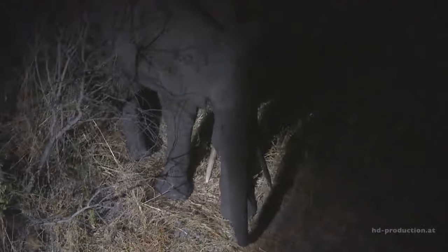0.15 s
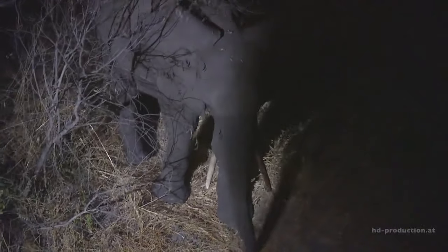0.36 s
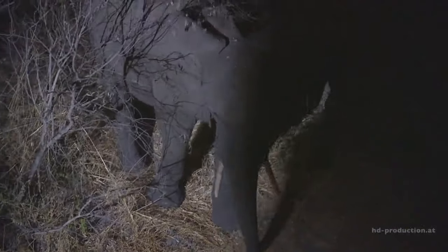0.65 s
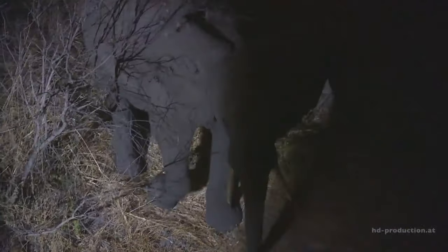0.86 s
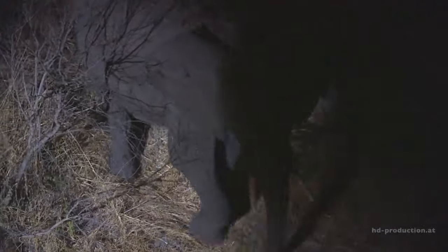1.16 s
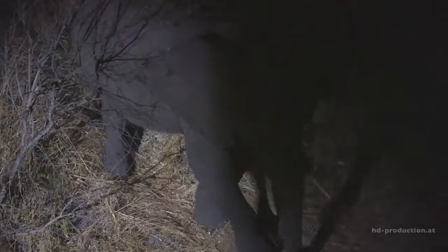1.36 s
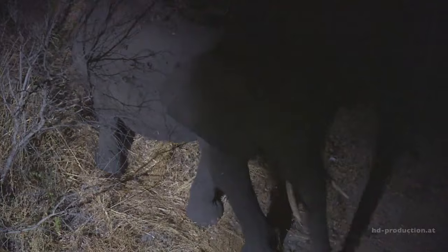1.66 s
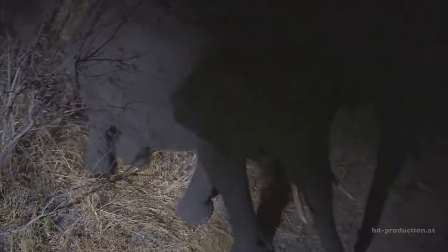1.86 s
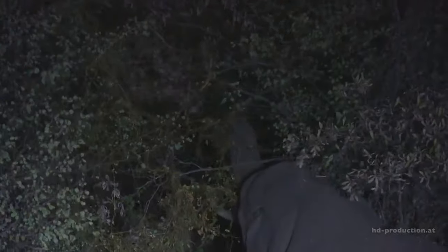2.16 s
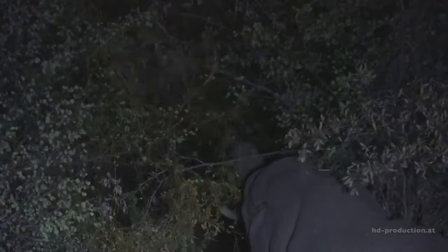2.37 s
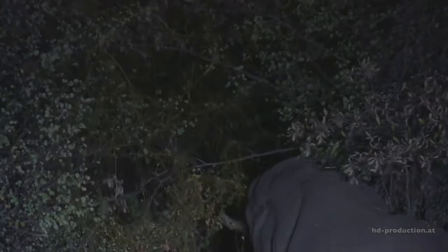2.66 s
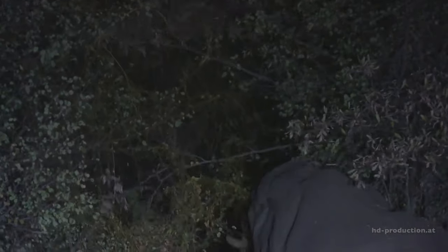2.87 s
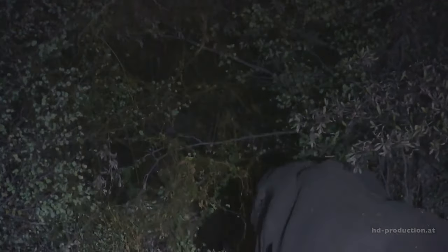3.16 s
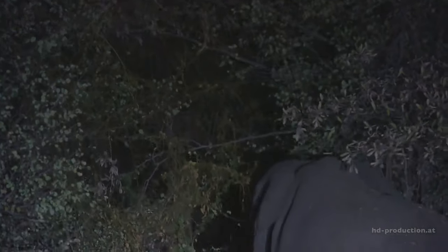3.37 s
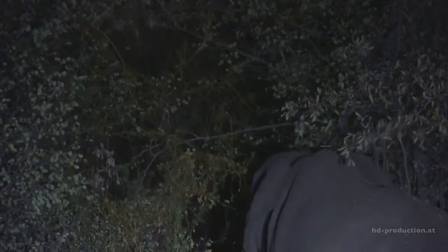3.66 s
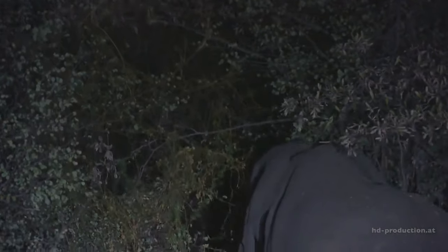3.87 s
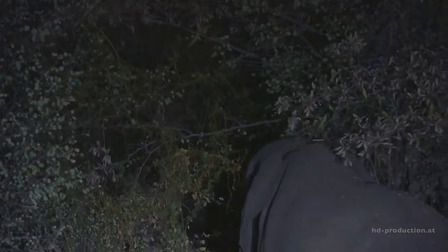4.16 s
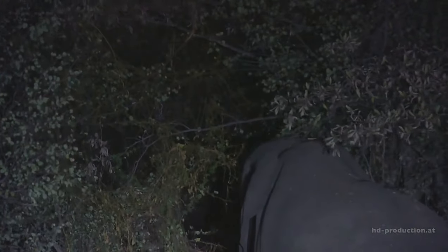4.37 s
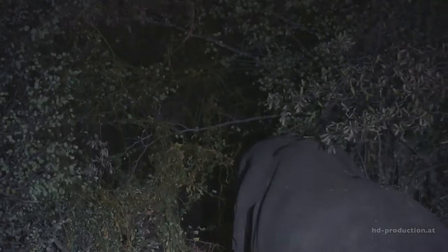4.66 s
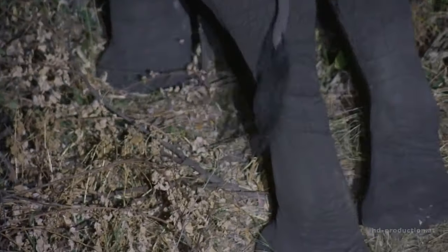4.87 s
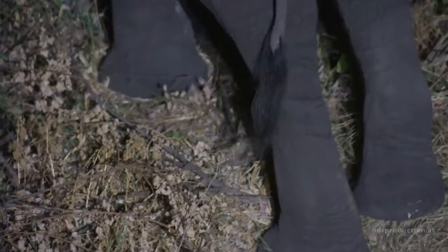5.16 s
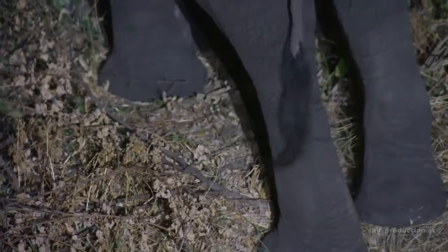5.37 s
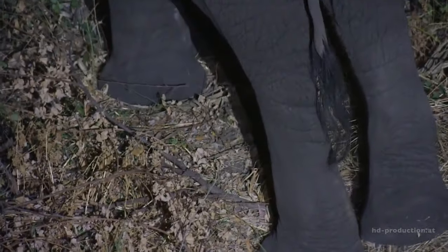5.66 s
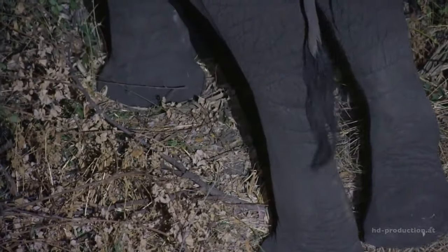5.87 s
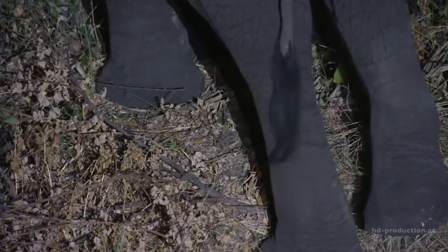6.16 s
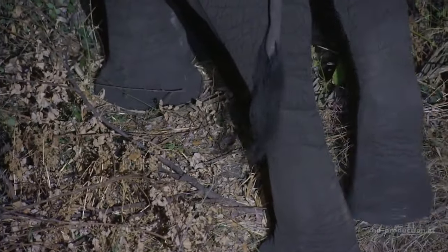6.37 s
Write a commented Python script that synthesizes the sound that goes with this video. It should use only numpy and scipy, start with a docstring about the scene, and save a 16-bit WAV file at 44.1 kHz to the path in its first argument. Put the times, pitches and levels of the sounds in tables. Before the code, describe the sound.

Dry foliage is dragged and broken by a feeding elephant outdoors, heard close and centred, with little echo. Bright twig cracks scatter over a gritty, flickering rustle; dull branch knocks and soft deep thuds sit underneath. Snaps are thick early, spaced in the middle, and one overloads the microphone at about four and a half seconds. After a last rapid burst, mostly leafy rustling remains, with tiny squeaks and a faint soft blow.

```python
"""An elephant tears at dry grass and shrubs a few metres from a microphone, at night in the bush.
Twigs snap: each is a sharp crack, parting fibres, a ring and a tail of scattered sound.
Leaves rustle and crackle: coloured noise that flickers, with thousands of tiny breaks.
Knocks, brief squeaks and a soft blow are noise in resonances; low thuds are sines near 80 Hz.
Behind them lie a low wavering rumble and two faint tones."""
import sys
import numpy as np
from scipy import signal
from scipy.fft import rfft, irfft, next_fast_len
from scipy.io import wavfile
from scipy.ndimage import uniform_filter1d

SR = 44100
rng = np.random.default_rng(int(sys.argv[2]) if len(sys.argv) > 2 else 0)


def undo_db(level):
    """Turn decibels back into plain size, where 20 dB means ten times bigger."""
    steps = np.asarray(level, float) / 20
    return 10 ** steps


def unload_audio(sound):
    """Save the sound as a 16-bit wav file, at the path given as the first command line argument."""
    columns = np.transpose(np.atleast_2d(sound))
    # keep every value between -1 and 1, then stretch to whole-number steps
    steps = np.round(np.clip(columns, -1, 1) * 32767)
    wavfile.write(sys.argv[1], SR, steps.astype(np.int16))


N = 287664
T = np.arange(N) / SR  # time in seconds

# Twig snaps: start_s, level_db (relative), ring_hz, knock_db (thick wood has more), scatter_db
SNAPS = [(0.0332, -24, 5100, -20, -7), (0.1627, -23.5, 5940, -7, -9), (0.179, -21, 6980, -8, -12),
         (0.2202, -21, 5470, 4, -13), (0.2832, -18, 10080, -7, -7), (0.3995, -18.5, 8140, -3, -9),
         (0.41, -21.5, 4610, 4, -5.5), (0.5076, -20.5, 6630, 1, -1.5), (0.526, -16.5, 8500, -7, 0.5),
         (0.5541, -13, 5940, -12, -18), (0.6044, -22.5, 1990, -2, -20), (0.657, -18, 5510, -7, -11),
         (0.669, -10.5, 5670, -7, -10.5), (0.773, -7, 5600, -24, -17), (0.8134, -10.5, 5900, -11, -14),
         (0.878, -19, 7490, -26, -4), (0.901, -17, 8700, -2.5, -3.5), (0.9279, -10.5, 6700, -18, -15),
         (0.953, -23, 6370, -13, -7), (1.002, -6, 2880, -21, -17), (1.009, -6, 6840, -22, -30),
         (1.043, -14.5, 5630, 1, -28), (1.0624, -14, 5800, -19, -8), (1.0734, -11, 4050, -25, -9.5),
         (1.154, -19, 7800, -1, -10), (1.188, -22.5, 6000, -4, -4.5), (1.22, -16.5, 6600, -5, -26),
         (1.332, -18.5, 9400, 2.5, -6), (1.3892, -10, 8870, -19, -12), (1.411, -19, 6980, -2, -28),
         (1.619, -23.5, 2700, -18, -7.5), (1.6664, -20, 3570, 2.5, -7.5), (1.7243, -18, 6370, -10, -11),
         (1.7338, -14.5, 8200, -11, -9.5), (1.7597, -11.5, 2320, 2, -14), (1.8636, -24, 2110, 3, -13),
         (1.806, -25, 1490, 4, -12), (1.945, -11.5, 1730, 2, -3.5), (1.9539, -8.5, 7100, 5.5, -5.5),
         (1.9907, -10.5, 7500, -2, -1), (2.03, -15, 2300, 1, -12.5), (2.1236, -17, 7700, 3.5, -7.5),
         (2.1583, -11, 8700, -26, -23), (2.22, -20.5, 3700, -17, -23), (2.3117, -21, 2270, -20, -26),
         (2.3924, -20, 1210, -3, -16), (2.4113, -17.5, 1920, -6, -34), (2.4288, -19, 8300, -16, -13),
         (2.555, -26.5, 3010, 4, -28), (2.574, -14.5, 3670, 2, -17), (2.6095, -26, 8310, 1, 0.5),
         (2.639, -7.5, 6860, -6, -4.5), (2.811, -15, 7920, -17, -9.5), (2.95, -23, 8000, -14, -3),
         (3.002, -16.5, 4780, -17, -4), (3.023, -20.5, 2890, -5, 0), (3.0523, -12.5, 2940, -23, -13),
         (3.1106, -19, 6590, -11, -28), (3.139, -22, 4090, -9, -30), (3.317, -16, 5200, -12, -2.5),
         (3.3592, -16, 2240, 9, -8), (3.382, -9, 2850, -13, -17), (3.3905, -12.5, 7920, -1, -17),
         (3.4382, -14, 8500, -24, -29), (3.4614, -16, 6030, -5, -6.5), (3.596, -5.5, 3800, -9, -13),
         (3.622, -20.5, 2500, 6, -3.5), (3.6834, -7.5, 4160, 3.5, -11.5), (3.7045, -16, 5120, -12, -8),
         (3.7468, 0, 3800, -11.5, -15), (3.958, -14.5, 6460, -3, -20), (4.059, -17, 2840, -12, -33),
         (4.289, -23.5, 6720, 8, -1), (4.3038, -14, 3480, -8, -8), (4.3274, -11.5, 6500, 3.5, -23),
         (4.3921, -19, 5600, 0, -7), (4.409, -15, 2800, -11, -7), (4.4206, 9, 3450, -14, -12),
         (4.5654, -22, 3500, -11, -8), (4.593, -26, 6000, -8, -8), (4.711, -20, 2870, -24, -2.5),
         (4.83, -23.5, 2600, -14, -10), (4.984, -21.5, 7920, -15, 1), (5.01, -17, 6890, 4.5, -4.5),
         (5.1036, -17.5, 3700, -8, -10), (5.3663, -7.5, 9000, -3, -4.5), (5.4866, -14.5, 8000, 1.5, -14),
         (5.5912, -23, 2200, -8, -15), (5.6388, -11, 5560, -8, -21), (5.7038, -11, 9850, 4, -10.5),
         (5.7228, -13, 2090, -6, -28), (5.732, -7.5, 8400, -8, -17), (5.7535, -17, 8100, -10, -13),
         (5.7578, -13, 5860, -6, -28), (5.7723, -5, 7960, -10, -13.5), (5.7926, -13.5, 5560, -10, -7),
         (5.8055, -18.5, 1790, -4, -31), (5.8506, -21, 7020, 0, -5), (6.0266, -27, 1500, 13, -17),
         (6.3994, -29.5, 2000, -2, -1.5), (6.433, -16, 9500, -13, -36)]
# Dull knocks: start_s, peak_db, pitch_hz, decay_ms
BUMPS = [(0.152, -38, 799, 7.1), (0.175, -37, 640, 18), (0.215, -39, 244, 6.4), (2.268, -39, 132, 12),
         (3.099, -44, 135, 5.7), (3.933, -35.5, 592, 6.5), (3.968, -35, 479, 5.7), (4.03, -33, 580, 7.8),
         (4.049, -37.5, 275, 16), (4.219, -41, 213, 4.4), (4.527, -38, 490, 4.7), (4.711, -42, 159, 11),
         (5.087, -37, 172, 4.3), (5.131, -33, 425, 5.4), (5.278, -37, 156, 6.5), (5.561, -38.5, 563, 8.4),
         (6.026, -36, 1270, 8.3), (6.263, -39.5, 730, 7.1), (6.36, -43, 869, 14), (6.431, -35, 209, 4.6)]
# Brief squeaks, and last a longer soft blow: centre_s, level_db, pitch_hz, width_hz, length_ms
SQUEAKS_AND_BLOW = [(2.330, -39.5, 5670, 70, 18), (5.592, -39, 2280, 90, 16), (5.612, -45, 1970, 90, 22),
                    (6.335, -48, 2900, 120, 7.3), (6.43, -49.5, 1330, 260, 190)]
# Low thuds: crest_s, level_db, pitch_hz (before sag and wobble), hold_s
THUDS = [(.4, -46.5, 77.8, .1), (0.556, -37, 75.3, 0.011), (0.628, -31, 79.5, 0.019),
         (0.747, -27, 75.6, 0.017), (0.82, -31, 76.5, 0.04), (1.658, -42, 77.3, .03),
         (2.884, -40, 86.2, .02), (3.013, -28, 67.8, 0.034), (3.261, -22, 78, 0.083),
         (4.796, -28.5, 80, 0.041), (4.879, -30, 80, .05), (4.995, -37.5, 75.3, .02),
         (5.07, -37, 71.6, .01), (5.148, -39.5, 69, .025), (5.255, -41, 69.9, .03),
         (5.358, -28.5, 80.4, .09), (5.482, -39, 79.2, 0.014), (6.125, -38, 74.7, 0.017),
         (6.157, -32.5, 77.6, 0.023)]
# Colour of the leaf rustle: pitch_hz, level_db (relative, per Hz)
LEAF_COLOUR = [(530, -46), (900, -7), (1650, -8), (2300, -8), (2500, 0), (3640, -2.5), (4050, 0),
               (4750, -1.5), (7920, 1.5), (11500, -4), (15000, -35), (22000, -120)]
# Colour of the dry leaf tips: pitch_hz, level_db (relative, per Hz)
TIP_COLOUR = [(8000, -24), (11000, -3), (13000, 2.5), (15600, -3)]
# Colour of the coarse stems: pitch_hz, level_db (relative, per Hz)
STEM_COLOUR = [(150, 8), (400, 2.5), (700, 9), (1200, -14.5), (1800, 7), (2600, -6), (5000, -9.5)]
# Colour of breaking wood: pitch_hz, level_db (relative, per Hz)
TWIG_COLOUR = [(530, -18.5), (1000, -17.5), (1650, -6.5), (2600, -3.5), (4000, -4), (6300, -4),
               (10600, -6.5), (13000, -12.5), (15600, -17.5)]
# Colour of the night rumble: pitch_hz, level_db (relative, per Hz)
AIR_COLOUR = [(20, 4), (30, 10.5), (45, -1), (62, -2), (80, 6.5), (100, -10), (130, -12), (320, -14),
              (500, -23.5), (1000, -37)]
# Loudness of the night rumble before it wavers: time_s, level_db
AIR_LEVEL = [(0, -49), (1.2, -47.5), (2.3, -47.5), (3.7, -44), (4.4, -45.5), (5.2, -44), (6.52, -47.5)]
# Faint tones: pitch_hz, level_db (before it wavers)
TONES = [(377, -70.5), (436, -67)]
# How loudly the leaves are dragged: time_s, rustle_db
DRAG = [(0, -47), (.4, -40.5), (.55, -43), (.8, -44.5), (.95, -40.5), (1.1, -43), (1.3, -48.5), (1.4, -47),
        (1.8, -45.5), (2.0, -42.5), (2.3, -47.5), (2.4, -45.5), (2.5, -48.5), (2.7, -45), (2.8, -43.5),
        (3.0, -40.5), (3.4, -42), (3.5, -46), (3.7, -38.5), (3.9, -37.5), (4.1, -43.5), (4.2, -38.5),
        (4.4, -38.5), (4.5, -35), (4.7, -35.5), (4.9, -40.5), (5.0, -38.5), (5.2, -35.5), (5.3, -42),
        (5.5, -39.5), (5.9, -42.5), (6.0, -39), (6.1, -44.5), (6.4, -43.5), (6.52, -46.5)]
# Make-up of the rustle: time_s, brightness (0 to 1), then tips_db, stems_db, crackle_db over the rustle
MIX = [(0, 0.5, -8, -9, 3), (.6, 0.3, -11, -12.5, 1.5), (1.4, 0.52, -8, -5, 6), (2.0, .4, -9, -7, 9),
       (2.6, 0.1, -12, -6, 6.5), (2.9, 0.78, -5, -9, 6), (3.2, 0.3, -6, -7, 5), (3.45, .4, -2, -7, 5.5),
       (3.8, .2, -7.5, -7, 6), (4.6, 0.55, -10, -15.5, 4.5), (5.2, 0.46, -4.5, -9, 1),
       (5.9, 0.34, -6, -6.5, 4), (6.15, .6, 1, -7, -5), (6.52, 0.7, -3, -8.5, -1)]

ECHO_HZ = 1071  # spacing of the notches that the echo cuts
CRACKLES = 2600  # number of tiny breaks
GRIT_CAP = 8  # keeps the rarest grains from becoming snaps
SPLINTER_MS = 2  # how long the fibres of a snap keep parting
SWELL_DB_S, HOLD_DB_S, FADE_DB_S = 900, 92, 450  # thuds: rise, sinking while held, dying away


def shape(table, size):
    """Frequencies and dB gains of a colour table, for a block of that size."""
    hz = np.maximum(np.arange(size // 2 + 1) * SR / size, 1)
    points = np.array(table, float)
    return hz, np.interp(np.log(hz), np.log(points[:, 0]), points[:, 1])


def noise(colour, tilt_db=0., grit_db=0.):
    """Noise of the given colour, rms 1; grit makes some grains stand out as tiny ticks."""
    size = next_fast_len(N)
    hz, db = shape(colour, size)
    grains = rng.standard_normal(size)
    grit = np.minimum(rng.exponential(size=size), GRIT_CAP)
    tilt = tilt_db * np.log2(hz / 6000)  # tilt_db is per octave
    x = irfft(rfft(grains * undo_db(grit_db * grit)) * undo_db(db + tilt), size)[:N]
    return x / np.std(x)


def walk(rate):
    """Random levels, rate per second, smoothed twice into a wandering line; spread near 1."""
    k = int(SR / rate)
    steps = np.repeat(rng.standard_normal(N // k + 1), k)
    return 1.343 * uniform_filter1d(uniform_filter1d(steps, k), k)[:N]


def air():
    """Low night rumble that wavers slowly, with two faint tones that waver in level and phase."""
    tones = np.zeros(N)
    for hz, db in TONES:
        level = np.sqrt(2) * undo_db(db + 0.98 * walk(4.8))
        tones += level * np.sin(2 * np.pi * hz * T + 0.45 * walk(12))
    rumble_db = np.interp(T, *np.transpose(AIR_LEVEL)) + 2.1 * walk(3.25)
    return undo_db(rumble_db) * noise(AIR_COLOUR) + tones


def thuds():
    """Nearly pure low swells that die within a few cycles."""
    out = np.zeros(N)
    wobble = 0.0406 * walk(30)
    for s, db, hz, hold_s in THUDS:
        before = np.maximum(s - T, 0)
        after = np.maximum(T - s, 0)
        held = np.minimum(after, hold_s)
        fading = np.maximum(after - hold_s, 0)
        level_db = db - SWELL_DB_S * before - HOLD_DB_S * held - FADE_DB_S * fading
        sag = 1 + 0.066 * np.clip(before / 0.028, 0, 1) + wobble  # pitch is higher in the swell
        phase = 2 * np.pi * (np.cumsum(hz * sag) / SR + rng.random())
        out += np.sqrt(2) * undo_db(level_db) * np.sin(phase)
    return out


def bumps():
    """Dull knocks of branches and soil: a puff of noise in one broad low resonance."""
    out = np.zeros(N)
    t = np.arange(4096) / SR
    for s, peak_db, hz, ms in BUMPS:
        puff = t * np.exp(-t * 1000 / max(ms, 1)) * rng.standard_normal(4096)
        knock = signal.lfilter(*signal.iirpeak(hz, 1.6, fs=SR), puff)
        knock *= undo_db(peak_db) / np.abs(knock).max()
        at = int(s * SR)
        out[at:at + 4096] += knock[:N - at]
    return out


def squeaks_and_blow():
    """Brief squeaks and one longer soft blow: noise in one narrow resonance."""
    out = np.zeros(N)
    for s, db, hz, width_hz, ms in SQUEAKS_AND_BLOW:
        resonance = signal.iirpeak(hz, hz / width_hz, fs=SR)
        tone = signal.lfilter(*resonance, rng.standard_normal(N))
        swell = np.exp(-((T - s) * 2000 / ms) ** 4)
        out += undo_db(db) * swell * tone / np.std(tone)
    return out


def breaks(colour, s, level_db, ring_hz, knock_db, ms, scatter_db, ring_db, scatter_s, size):
    """Each break: a sharp crack, parting fibres, a broad ring; nearby leaves scatter it into a tail."""
    lead = size // 16  # samples before the crack
    t = (np.arange(size) - lead) / SR
    after = np.maximum(t, 0)
    tau = np.clip(ms, .1, 12)[:, None] / 1000
    fibres = rng.standard_normal((len(s), size))
    creak = np.exp(np.minimum(t, 0) / 0.00058)  # the wood gives a moment before it cracks
    burst = 0.38 * creak * np.exp(-after / tau) * fibres
    burst[:, lead] += 2.29 * np.sign(fibres[:, 0])  # the crack itself
    tail = undo_db(scatter_db)[:, None] * creak * np.exp(-after / scatter_s) * fibres

    hz, db = shape(colour, size)
    centre = ring_hz[:, None]
    ring = ring_db * np.exp(-(np.log2(hz / centre) / 0.45) ** 2)
    # thin stems are brighter
    thin = 2.7 * np.log2(centre / 5000) * np.log2(np.clip(hz, 1000, 16000) / 5000)
    # thick wood adds a dull knock
    body = undo_db(knock_db)[:, None] * np.exp(-(np.log2(hz / 800) / 0.86) ** 2)

    # an inverted echo about a millisecond later combs the lower octaves, clearest on big branches
    depth = np.clip(0.28 + 0.015 * level_db, 0, .9)[:, None]
    comb = 1 - depth * np.exp(-2j * np.pi * hz / ECHO_HZ) / (1 + (hz / 4500) ** 2)
    burst = rfft(burst)
    crack = irfft(comb * burst * undo_db(db + ring + thin), size)
    # the scatter keeps only part of the stick's own ring and little of its knock
    scatter = rfft(tail) * (undo_db(db + 0.13 * (ring + thin)) + 0.18 * body)
    sound = crack + irfft(comb * (burst * body + scatter), size)
    sound *= (0.76 * undo_db(level_db) / np.abs(crack).max(axis=1))[:, None]

    out = np.zeros(N + 2 * size)
    np.add.at(out, (s * SR).astype(int)[:, None] + np.arange(size), sound)
    return out[lead:][:N]


def crackles(over_db):
    """Countless small breaks at random times, many faint and a few strong; over_db steers them."""
    when, strength, pitch, knock, length = rng.random((CRACKLES, 5)).T
    when = when * T[-1]
    level_db = np.interp(when, T, over_db) - 3.3 * np.log(1 - .98 * strength)
    return breaks(TWIG_COLOUR, when, level_db, 1800 * 6 ** pitch, -22 + 12 * knock,
                  0.11 + 1.2 * length ** 2, np.full(CRACKLES, -16.),
                  ring_db=4.0, scatter_s=0.0033, size=1024)


def leaves():
    """Dense rustle of leaves, dry tips and stems: flickering coloured noise, with small crackles."""
    rustle_db = np.interp(T, *np.transpose(DRAG))
    s, *columns = np.transpose(MIX)
    bright, tip_db, stem_db, crackle_db = (np.interp(T, s, column) for column in columns)
    bright = np.clip(bright, 0, 1)
    grain = undo_db(1.38 * walk(60) + 1.7 * walk(400))
    bright_leaves = np.sqrt(bright) * noise(LEAF_COLOUR, 4.0, grit_db=2.5)
    dull_leaves = np.sqrt(1 - bright) * noise(LEAF_COLOUR, -1.53, grit_db=3.0)
    rustle = grain * (bright_leaves + dull_leaves)
    tips = grain * undo_db(0.74 * walk(50)) * noise(TIP_COLOUR, grit_db=3.0)
    stems = undo_db(2.45 * walk(40)) * np.sqrt(grain) * noise(STEM_COLOUR)
    dragged = undo_db(rustle_db) * (rustle + undo_db(tip_db) * tips + undo_db(stem_db) * stems)
    return crackles(rustle_db + crackle_db) + dragged


def twigs():
    """The louder snaps, one by one, as wood that breaks and rings."""
    s, level_db, ring_hz, knock_db, scatter_db = np.transpose(SNAPS)
    splinter_ms = np.full(len(s), float(SPLINTER_MS))
    return breaks(TWIG_COLOUR, s, level_db, ring_hz, knock_db, splinter_ms, scatter_db,
                  ring_db=8.5, scatter_s=0.014, size=4096)


def scene():
    """Everything at one microphone, the same in both ears."""
    mono = twigs() + leaves() + bumps() + squeaks_and_blow() + thuds() + air()
    return np.array([mono, mono])


def top_cut(x):
    """Nothing passes above the cut-off."""
    return signal.sosfilt(signal.butter(12, 16670, fs=SR, output="sos"), x)


def record(dry):
    """The loudest snap overloads the input, which clips."""
    mix = np.clip(dry, -1, 1)
    return top_cut(mix)


dry = scene()
out = record(dry)
unload_audio(out)
```